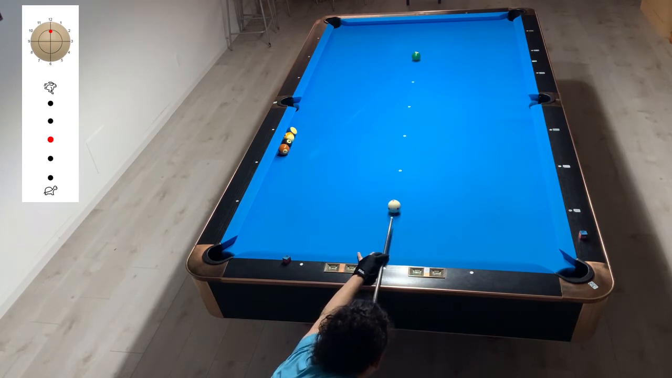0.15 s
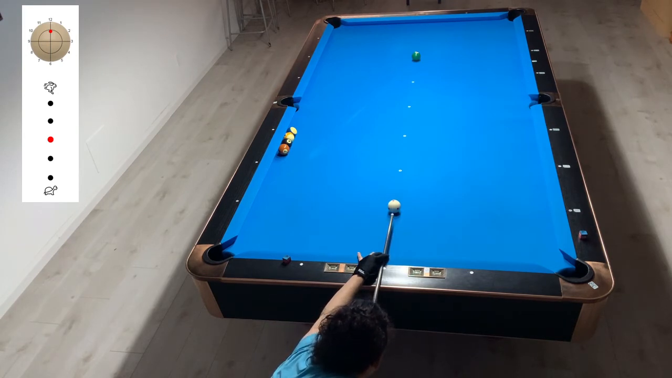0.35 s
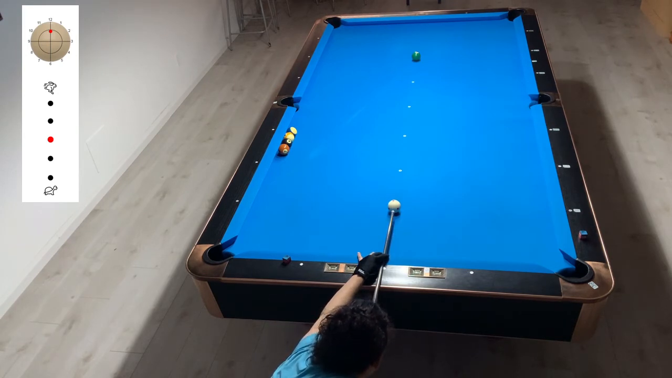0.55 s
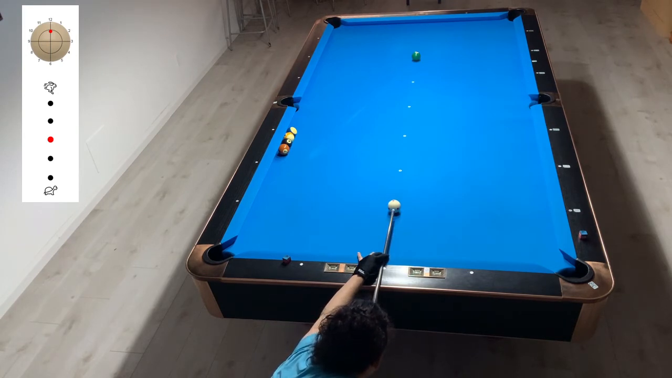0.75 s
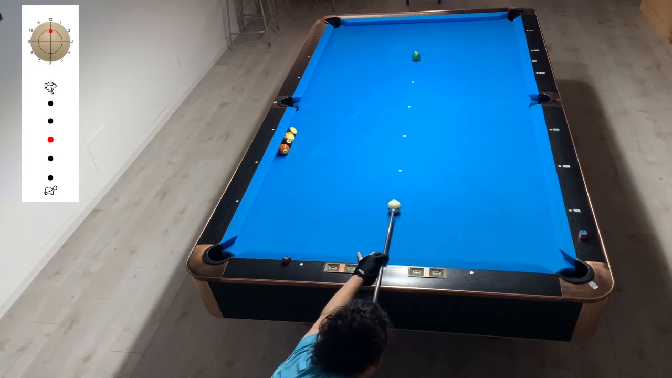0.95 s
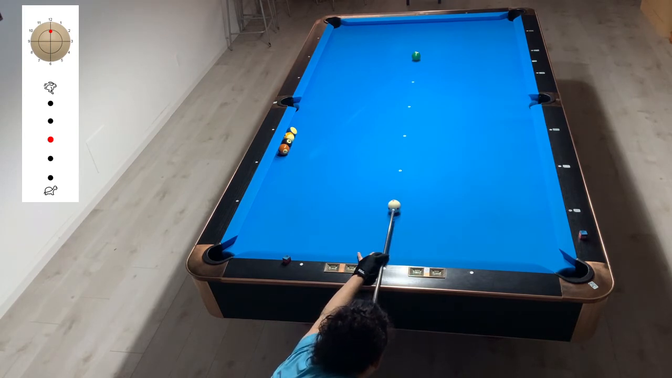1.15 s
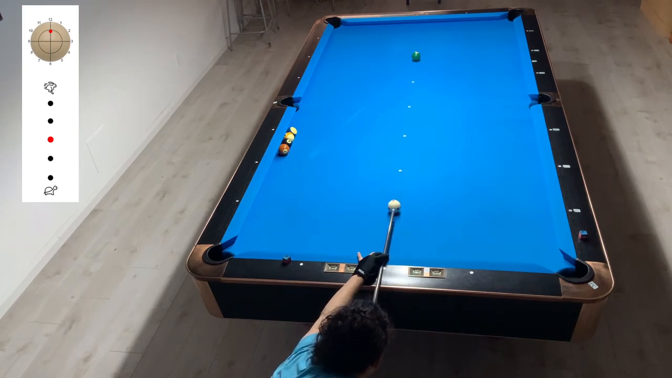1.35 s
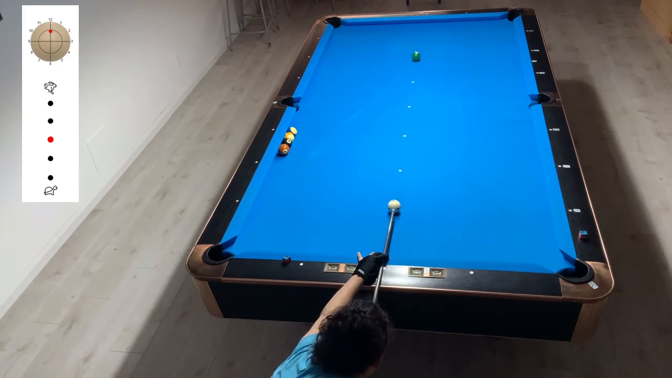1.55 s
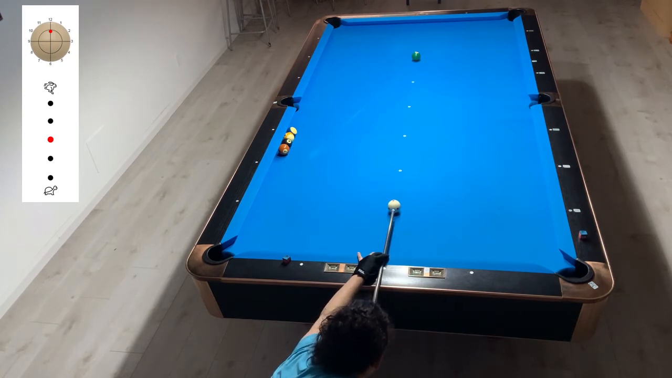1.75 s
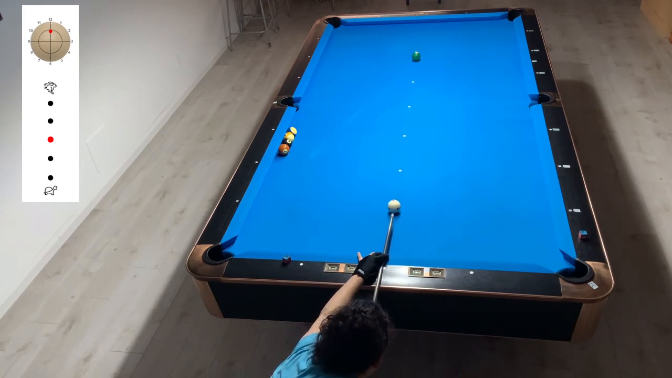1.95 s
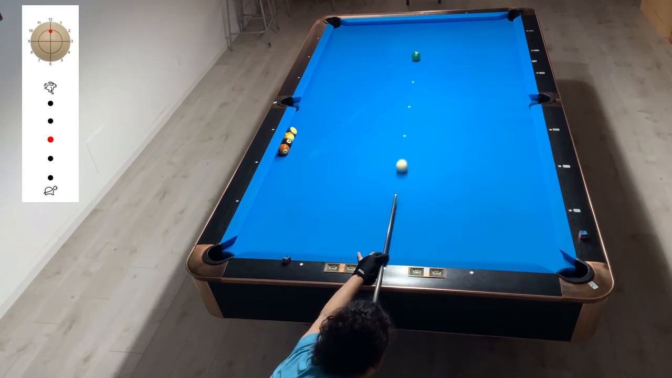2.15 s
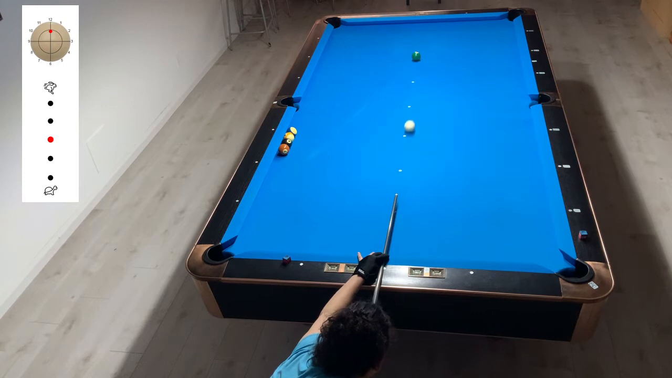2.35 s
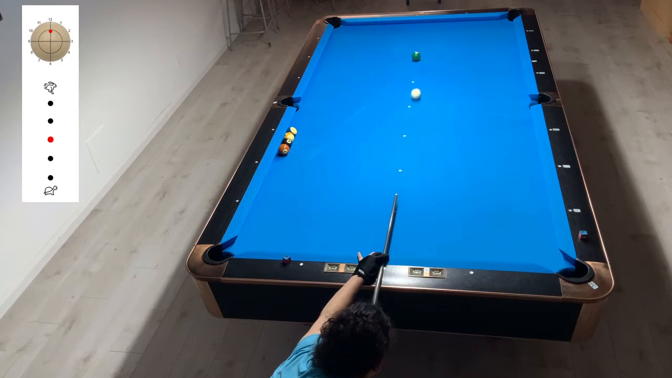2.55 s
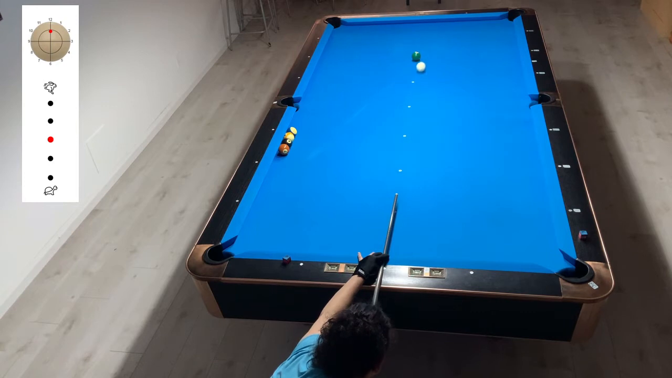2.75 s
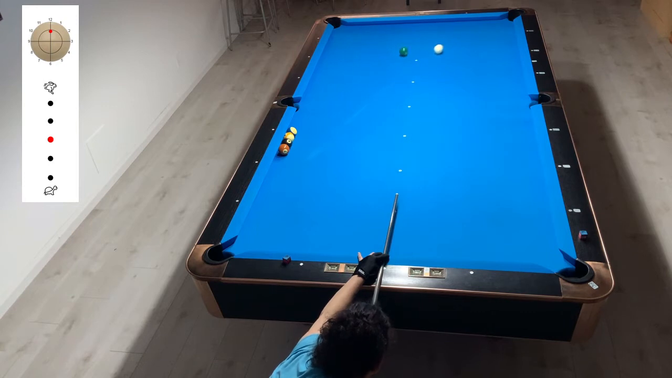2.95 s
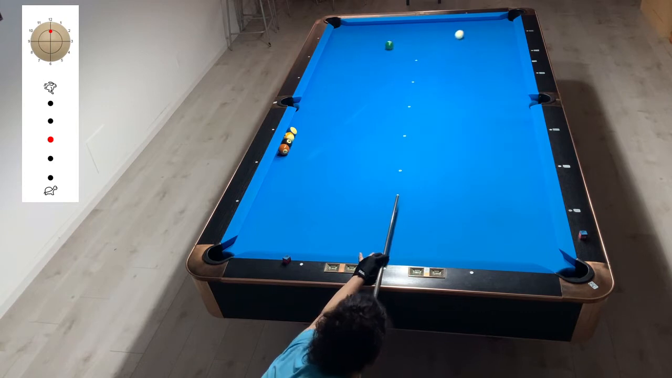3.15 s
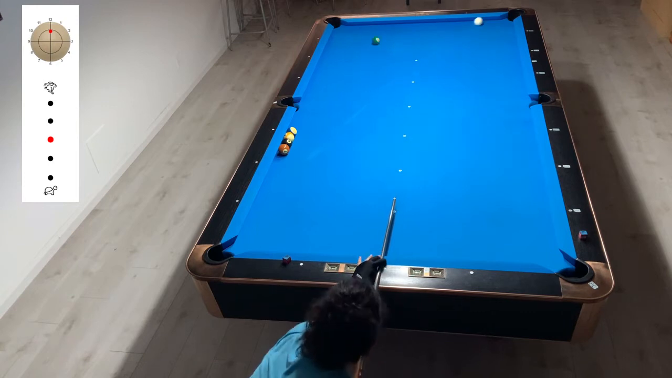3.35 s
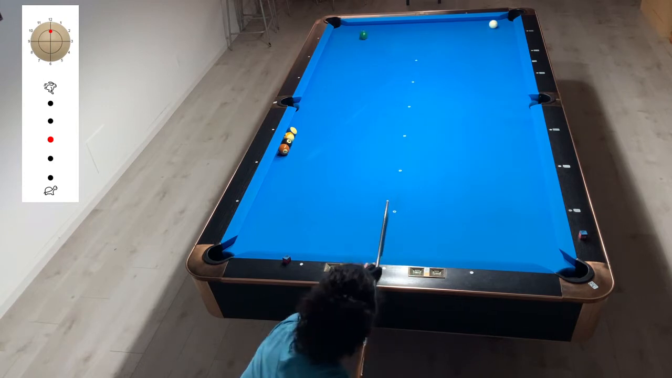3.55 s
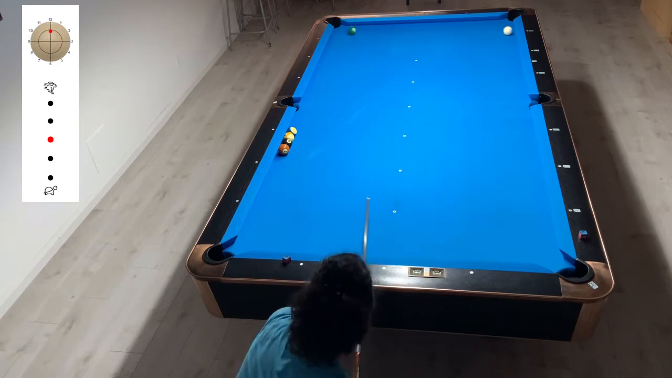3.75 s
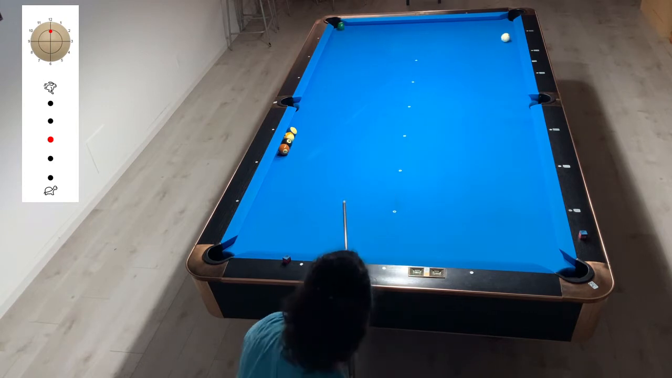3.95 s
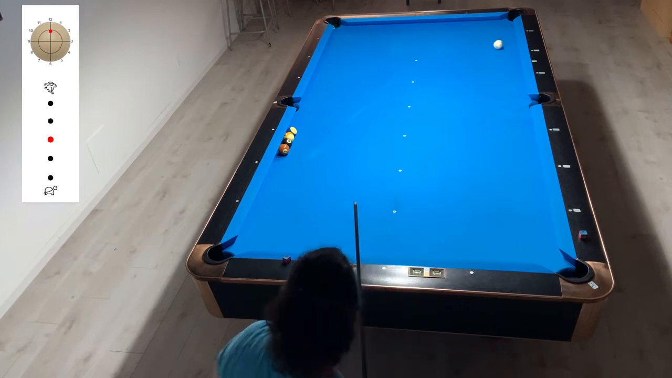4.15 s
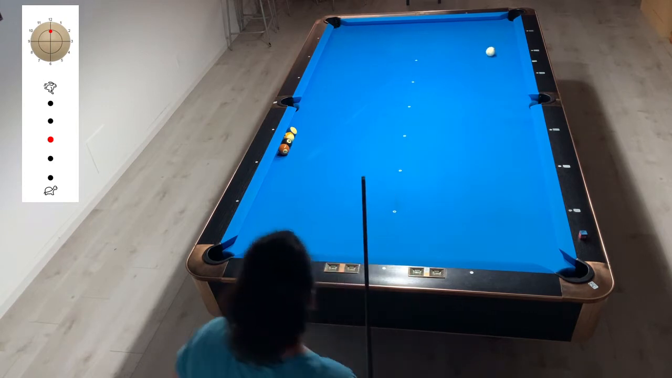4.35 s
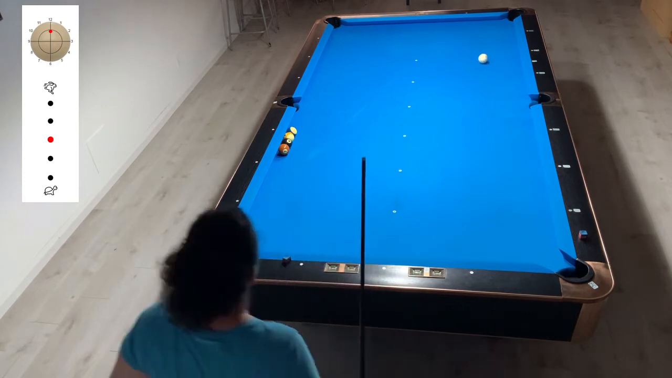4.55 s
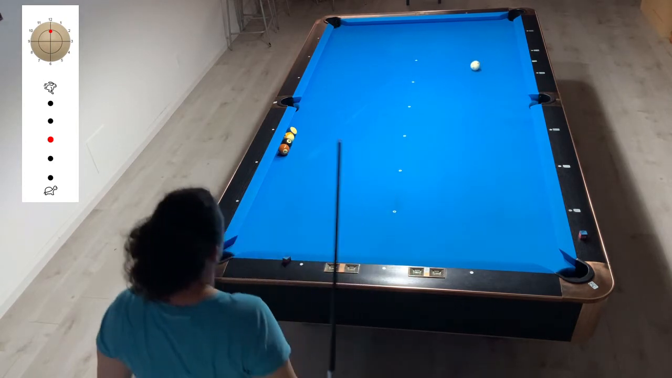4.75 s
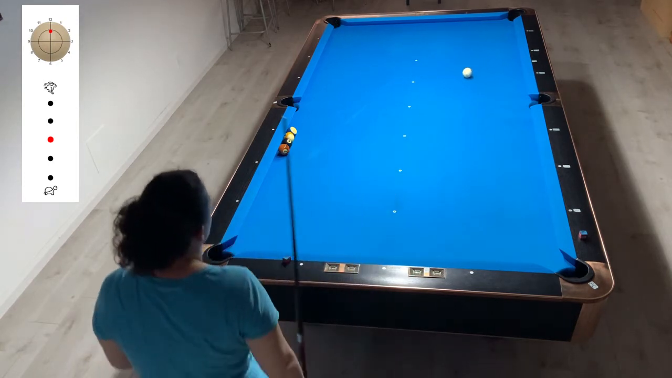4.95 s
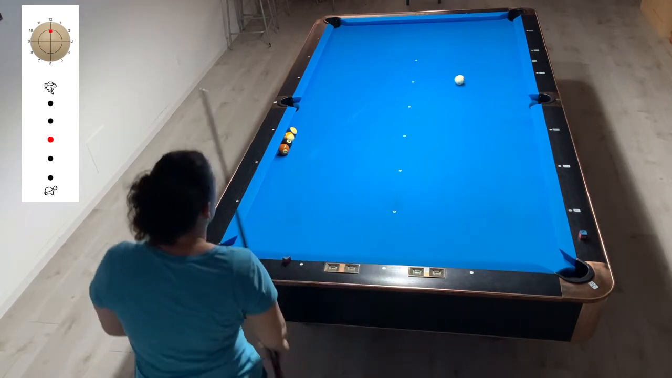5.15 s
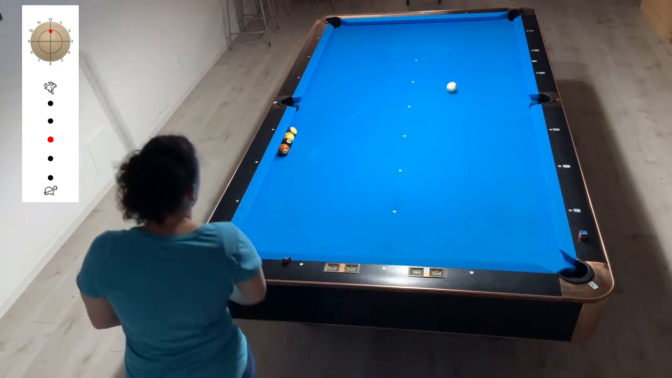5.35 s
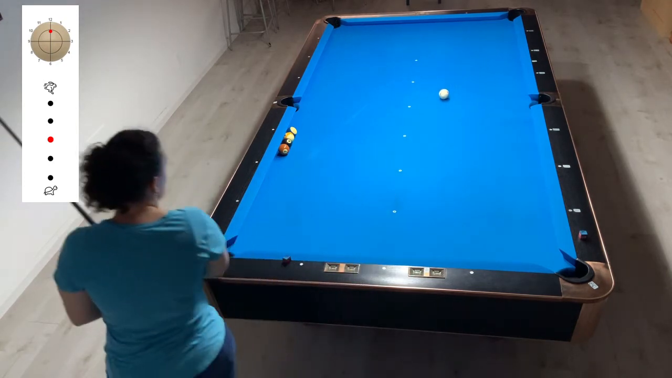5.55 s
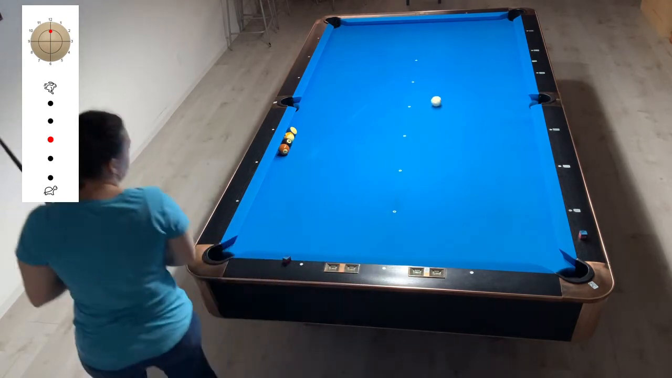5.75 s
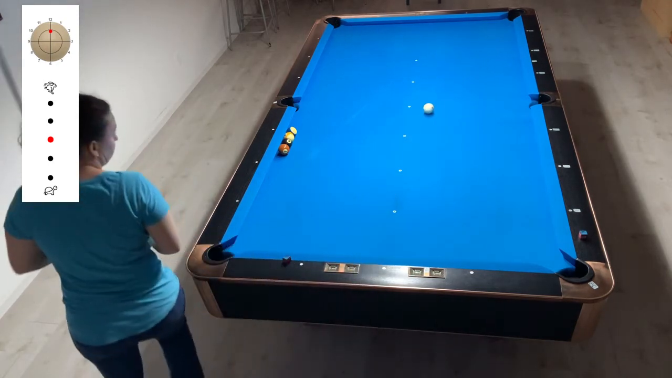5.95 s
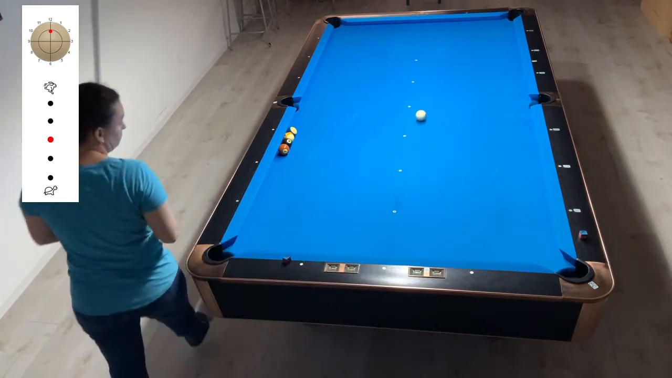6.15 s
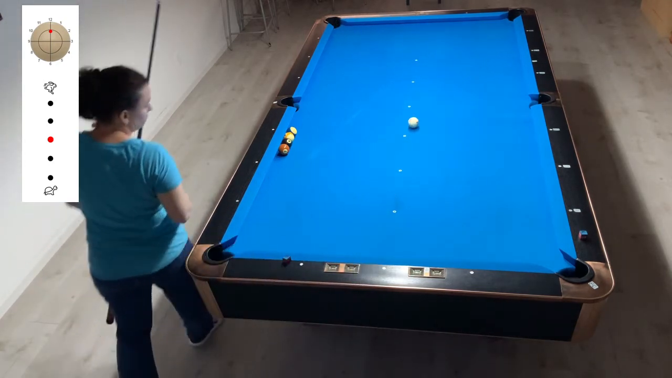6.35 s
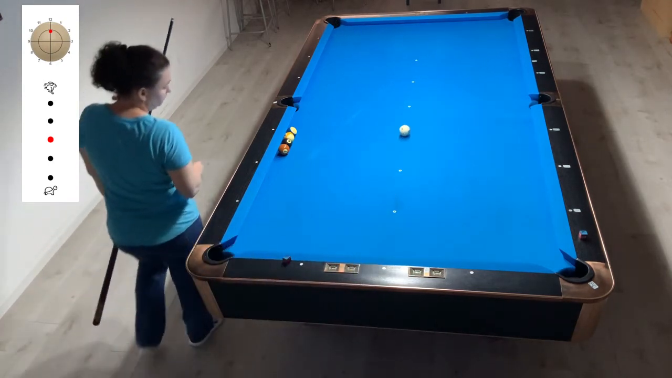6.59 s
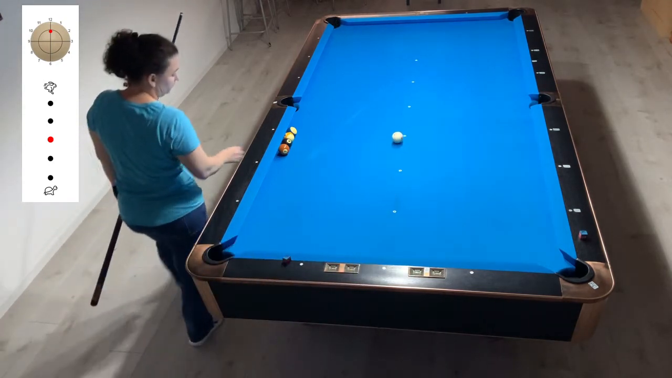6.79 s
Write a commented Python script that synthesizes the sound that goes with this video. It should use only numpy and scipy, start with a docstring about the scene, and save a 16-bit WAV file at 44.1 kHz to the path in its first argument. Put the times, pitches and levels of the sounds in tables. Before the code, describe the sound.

A quiet, hard-walled billiard room has a low, dull background, with faint cloth and hand swishes during the first two seconds. At 2.0 a cue tip cracks sharply against a ball; the wooden shaft rings briefly and a deep, wavering table hum follows. Soft rolling continues until a short, hard ball-to-ball click at 2.87 with a slight slate thud. At 3.45 comes a dull, low cushion thump, then small knocks at 3.87 and 4.09 amid clearer clothing rustle. From 4.26 to 4.64 a ball falls into the pocket in a loud, irregular cluster of hollow wooden clacks and bright ticks, with a strong rumble. It rolls away inside the table, with weaker knocks around 4.8, 5.06, 5.4, 5.6, 5.86, 6.07 and 6.22 and soft pattering bumps. Clothing swishes continue until about 6.8 as rolling and hum fade. Stereo, with close reflections and a short echoing tail.

```python
"""A billiard ball knocks its way over cushion and pocket and down the wooden trough inside the table: each
knock mixes hollow wooden modes, a clack, a bright tick and a frame thump. Before that a cue strikes the white
ball (crack and shaft modes), which clicks on another (a short pulse and high modes). Three deep table modes
hum in beats, shaped noise makes the rolling, the rustling clothes and the room's floor, and a bare hard room
of echoes and dying random taps rings around a small two-port microphone."""
import sys
import numpy as np
from scipy import signal
from scipy.fft import rfft, irfft, next_fast_len
from scipy.io import wavfile
from scipy.ndimage import uniform_filter1d

SR = 44100
rng = np.random.default_rng(int(sys.argv[2]) if len(sys.argv) > 2 else 0)


def wav_record(signal):
    """Record a signal, one row per channel, as 16-bit PCM in the file named by sys.argv[1]."""
    frames = np.transpose(np.atleast_2d(signal))
    bounded = np.clip(frames, -1, 1)
    # unit amplitude maps onto the largest positive 16-bit level
    quanta = np.round(bounded * 32767).astype(np.int16)
    wavfile.write(sys.argv[1], SR, quanta)


N = 300894  # length [samples]

# steady floor of the room, shape only: (frequency [Hz], relative density [dB])
AIR_SHAPE = [(18, -34.5), (30, -1), (64, 0.5), (143, -2), (328, -12), (662, -9), (1240, -22.5), (2310, -30),
             (2560, -35), (7430, -45), (8470, -37.5), (9390, -41.5), (11600, -43.5), (13900, -49.5),
             (15000, -44.5)]
# swishes of cloth and hands, rise and fall spanning 20 dB each:
# (loudest time [s], level before shaping [dB], tilt [dB/octave], rise [s], fall [s])
SWISHES = [(.464, -85.5, -8.5, 0.08, 0.23), (1.124, -90, -5, 0.073, 0.18), (1.462, -87, -10.5, 0.057, 0.27),
           (1.992, -78, -10, 0.07, 0.26), (2.448, -86, -12, 0.051, 0.25), (3.504, -83, -8, 0.88, 0.38),
           (4.0, -67.5, -4, 0.2, 0.11), (4.092, -72.5, -8.5, 0.081, 0.47), (5.042, -75, -10.5, 0.28, 0.71),
           (5.66, -71.5, -8, 0.15, 0.22), (6.11, -74.5, -10.5, 0.39, 0.38), (6.36, -77, -7, .5, 0.34),
           (6.682, -76, -11, 0.23, 0.28)]
# balls rolling on cloth and wood: (time [s], level before shaping [dB])
ROLL_LEVEL = [(2.018, -48), (2.05, -27.5), (2.19, -62.5), (2.32, -67), (2.86, -59.5), (3.22, -68),
              (3.5, -55), (4.12, -87), (4.311, -27), (4.48, -41), (4.79, -50.5), (5.19, -64.5),
              (5.54, -48.5), (5.68, -75), (5.91, -54.5), (6.82, -68)]
# level of the table's hum: (time [s], level [dB])
HUM_LEVEL = [(2.02, -59), (2.1, -33.5), (2.3, -38.5), (2.48, -50), (2.58, -37), (2.8, -46), (3.05, -37.5),
             (3.25, -37), (3.36, -49.5), (3.75, -48), (4.26, -65.5), (4.33, -33), (4.5, -33.5),
             (4.8, -38.5), (4.95, -47.5), (5.15, -49.5), (5.3, -66.5), (5.5, -51.5), (6.1, -54), (6.4, -61),
             (6.62, -48.5), (6.82, -64.5)]
# three close deep modes of the table that beat together: (frequency [Hz], sign at the blow [+1 or -1])
HUM_MODES = [(59.8, 1), (64.6, -1), (69.5, -1)]
# each heavy blow restarts them in its own mix, relative to one another:
# (time [s], low mode [dB], middle mode [dB], high mode [dB])
HUM_STARTS = [(2.0196, -11, -5, -16.5), (2.8648, -14, -6, -9.5), (3.451, -5, 6, -14.5), (4.294, 0, -18, -6),
              (5.373, -11, -18.5, 1.5)]
# modes of the table's frame: (frequency [Hz], relative level [dB], t60 [s])
FRAME_MODES = [(98, 0, .7), (122, -11, .25), (142, -8, .25), (174, -5, .2), (200, -11, .2)]
# the cue stroke: (time [s], level of the shaft's ring [dB])
STROKE = (2.0195, -16)
# modes of the wooden cue shaft: (frequency [Hz], relative level [dB], t60 [s])
SHAFT_MODES = [(305, -1, 0.018), (422, -7.5, 0.022), (560, 2, 0.016), (755, -2.5, 0.022), (995, 0.5, 0.011),
               (1133, -0.5, 0.03), (1328, -8, 0.049), (1590, -9, 0.0081), (1742, -9, .06),
               (2018, -1.5, 0.016), (2430, 5.5, 0.0079), (2780, -5, 0.018), (3305, -4.5, 0.0091),
               (4410, -9.5, .005)]
# ball on ball: (time [s], pulse level before its low-pass [dB])
CLICK = (2.8655, -13)
# bands of the short pulse from the squeezed contact: (frequency [Hz], width [Hz], relative level [dB])
CONTACT_BANDS = [(1352, 1360, 4.5), (2040, 1180, 8), (2714, 830, 0.5), (3460, 710, -10.5)]
# the balls' own high modes: (frequency [Hz], relative level [dB], t60 [s])
BALL_MODES = [(5530, -2.5, 0.0021), (8850, -12.5, 0.0063), (10700, -8, 0.003), (13840, 2, 0.0025),
              (15600, 1.5, 0.0022)]
# knocks on cushion, pocket and trough: (time [s], hollow ring [dB], its centre [Hz],
# clack [dB], its centre [Hz], tick [dB], thump [dB])
KNOCKS = [(3.451, -46, 310, -80, 1500, -88, -42.5), (3.872, -56, 360, -58.5, 2200, -80, -57.5),
          (4.088, -56, 484, -48.5, 1770, -82, -81), (4.259, -27.5, 594, -34.5, 2000, -33, -37.5),
          (4.295, -29, 520, -27.5, 2430, -27, -36), (4.309, -19.5, 540, -34.5, 1300, -45, -29.5),
          (4.327, -30, 450, -50, 2700, -42, -27.5), (4.347, -33, 544, -29, 1190, -28, -49),
          (4.402, -55, 457, -39.5, 1300, -59, -40), (4.511, -28.5, 540, -25, 2640, -33, -57),
          (4.523, -24.5, 542, -42, 2700, -44, -45), (4.585, -44, 536, -45.5, 1290, -63, -47),
          (4.638, -36, 470, -35, 1940, -72, -46), (4.781, -49, 540, -54, 2000, -85, -72),
          (5.055, -49.5, 487, -70, 2000, -78, -68), (5.369, -48, 560, -41.5, 2080, -99, -44),
          (5.394, -46, 443, -51, 2700, -79, -56), (5.551, -41, 440, -78, 1500, -73, -67),
          (5.637, -52, 358, -63, 2000, -55, -56.5), (5.650, -71, 430, -52.5, 4500, -42.5, -71),
          (5.856, -48.5, 507, -70, 2000, -70, -69), (6.065, -46, 494, -61, 1290, -76, -58),
          (6.222, -48.5, 482, -54, 1750, -79, -52.5)]
# slow modes of the hollow wood, before detuning: (frequency [Hz], relative level [dB], t60 [s])
HOLLOW_MODES = [(282, 10, 0.05), (379.5, 8.5, 0.058), (457, -7.5, 0.15), (536.7, 2, 0.069),
                (637, -6.5, 0.042), (678, -1.5, 0.028)]
# short modes of the clack, before detuning: (frequency [Hz], relative level [dB], t60 [s])
CLACK_MODES = [(916, -4, 0.012), (1231, 0.5, 0.014), (1848, 2.5, 0.0088), (2180, -4, 0.012),
               (2576, 3, 0.01), (3540, 0.5, 0.0069), (4410, -7, 0.0076)]
# left-right likeness of the room and the steady noises: (frequency [Hz], likeness [0-1])
LIKENESS = [(60, 0.99), (250, 0.9), (640, 0.24), (1400, 0.11), (6000, 0.019)]
# decay of the room: (frequency [Hz], t60 [s])
ROOM_DECAY = [(100, 1.37), (300, 0.81), (700, 0.5), (1500, 0.67), (3000, 0.51), (5500, 0.52), (8000, 0.36),
              (13000, 0.23)]
# single echoes off table, floor and walls: (delay [s], level [dB])
ECHOES = [(.0044, -1), (.0068, -7), (.0082, -5), (.0097, -6), (.0165, -13), (.026, -9), (.029, -10),
          (.034, -11)]
# left-right likeness and phase of the treble: (frequency [Hz], likeness [0-1], lead [radians])
PORTS = [(4500, 0, 4.5), (7500, .6, 7.9), (8600, .8, 8.9), (9100, .99, 9.42), (10100, .99, 9.43),
         (10500, .75, 10), (11900, .55, 11.4), (12500, .98, 12.56), (14000, .98, 12.57), (14700, .5, 13.8),
         (15500, .6, 15)]
# colour of the microphone: (frequency [Hz], gain [dB])
MICROPHONE = [(22, -16), (45, 0), (14000, 0), (14700, -4), (15500, -5)]

AIR_DB = -61.5
STIR_DB, STIR_TILT_DB = -99, -3.5  # faint stirring under the swishes, before shaping; tilt per octave
LEAD_S = 8 / SR  # the steady noises reach the left port first
PATTER_SPAN_S, PATTER_COUNT = (5.4, 6.0), 7
PATTER_DB, PATTER_HZ = -62, 450  # middle values of the random spread
SLATE_HZ = 151  # blows on the slate favour the frame modes near here
CRACK_S = .0009  # time constant of a crack's fade
CLACK_SPREAD, CLACK_FOCUS_DB = .04, -6  # mode shift as a share of pitch; dB an octave off the centre
RING_PAN_DB, CLACK_PAN_DB = 1, -1  # left minus right
NEARNESS_DB = 7  # how much less room a near sound gets
EDGE_HZ = 15780  # upper band limit


def gain_of(db):
    """Turns decibels into amplitude gain."""
    return 10 ** (np.asarray(db) / 20)


def evened(x):
    """Scales a signal to rms 1."""
    return x / np.sqrt(np.mean(x ** 2) + 1e-20)


def read(points, hz, column=1):
    """Reads a spectrum table on a log-frequency axis."""
    rows = np.transpose(points)
    return np.interp(np.log(hz + 1), np.log(rows[0] + 1), rows[column])


def octaves_off(modes, centre_hz):
    """Distance of each mode from a centre pitch, in octaves."""
    mode_hz = np.transpose(modes)[0][:, None]
    return abs(np.log2(mode_hz / centre_hz))


def add(mix, s, sound, pan_db=0):
    """Places a sound in both channels, panned by left minus right dB."""
    part = mix[:, round(s * SR):][:, :len(sound)]
    part += gain_of([[pan_db / 2], [-pan_db / 2]]) * sound[:part.shape[1]]


def ring(modes, rise_s, detune=1, lift_db=0):
    """Struck body: dying modes of alternate sign that build up over rise_s, scaled to peak 1."""
    hz, db, t60 = np.transpose(modes)[:, :, None]
    t = np.arange(int(t60.max() * SR) + 400) / SR
    sign = (-1) ** np.arange(len(hz))[:, None]
    fade = gain_of(db + lift_db - 60 * t / t60)
    tones = sign * fade * np.sin(2 * np.pi * hz * detune * t)
    out = tones.sum(0) * (1 - np.exp(-t / rise_s)) ** 2
    return out / abs(out).max()


def tick(top_hz):
    """A brief bright crack where hard surfaces meet: fading band-passed noise of energy 3."""
    grit = rng.standard_normal(200)
    crack = grit * np.exp(-np.arange(len(grit)) / SR / CRACK_S)
    crack = signal.lfilter(*signal.butter(1, [4000, top_hz], "band", fs=SR), crack)
    return crack / np.linalg.norm(crack) * np.sqrt(3)


def noise(shape_db, patchy_db, size):
    """Two-channel noise from random short-time spectra; shape_db(hz, t) gives the level field."""
    frames, hz = 4 * N // size + 5, np.fft.rfftfreq(size, 1 / SR)[:, None]
    a, b, c, d, patches = rng.standard_normal((frames, len(hz), 5)).T
    patches = uniform_filter1d(patches, size=12, axis=0)  # blur over frequency, then over time
    patches = evened(uniform_filter1d(patches, size=10, axis=1))
    same = np.clip(read(LIKENESS, hz), 0, 1)
    left = a + 1j * b
    delayed = left * np.exp(-2j * np.pi * hz * LEAD_S)
    right = same * delayed + np.sqrt(1 - same ** 2) * (c + 1j * d)
    t = np.arange(frames) * size / 4 / SR
    spectra = np.array([left, right]) * gain_of(shape_db(hz, t) + patchy_db * patches)
    return signal.istft(spectra, nperseg=size, noverlap=3 * size // 4)[1][:, :N]


def air():
    """The steady floor of the room, as shaped noise at a set rms."""
    steady = noise(lambda hz, t: read(AIR_SHAPE, hz) + 0 * t, patchy_db=.8, size=2048)
    return gain_of(AIR_DB) * evened(steady)


def rustle():
    """Patchy friction noise with two broad scuffing bands, rising and falling with each swish."""
    s, db, tilt_db, rise_s, fall_s = np.transpose(SWISHES)[:, :, None, None]

    def field(hz, t):
        low_cut_db = -18 * np.maximum(np.log2(1100 / (hz + 30)), 0)
        scuff_db = 4 * np.exp(-((hz - 2700) / 450) ** 2) + 3 * np.exp(-((hz - 4900) / 900) ** 2)
        octaves = np.log2((hz + 300) / 4500)
        swell_db = db - 20 * np.maximum((s - t) / rise_s, (t - s) / fall_s)
        # doubled decibels turn gain into power, so the swishes add as powers
        swishes = gain_of(2 * (swell_db + tilt_db * octaves)).sum(0)
        stirring = gain_of(2 * (STIR_DB + STIR_TILT_DB * octaves))
        level_db = 10 * np.log10(swishes + stirring)
        return level_db + low_cut_db + scuff_db - 11.5  # overall level of the rustle
    return noise(field, patchy_db=2.5, size=512)


def rolling():
    """Balls rumble over hollow wood: patchy noise around 480 Hz under the rolling level."""
    s, db = np.transpose(ROLL_LEVEL)

    def field(hz, t):
        body_db = -9 * np.log2((hz + 20) / 480) ** 2
        skirt_db = -25 - 3 * np.log2(hz / 500 + 1)
        level_db = np.interp(t, s, db, left=-99)
        return level_db + np.maximum(body_db, skirt_db) - 16.0  # overall level of the rolling
    return noise(field, patchy_db=4.0, size=1024)


def hum():
    """Three deep table modes beat, mixed anew at each heavy blow, under one level curve."""
    t, starts = np.arange(N) / SR, np.array(HUM_STARTS)
    hz, sign = np.transpose(HUM_MODES)[:, :, None]
    last = np.maximum(np.searchsorted(starts[:, 0], t) - 1, 0)  # the latest blow at each moment
    mix = gain_of(starts[:, 1:])
    share = mix / np.linalg.norm(mix, axis=1, keepdims=True)
    since_blow = t - starts[last, 0]
    tones = (sign * share[last].T * np.sin(2 * np.pi * hz * since_blow)).sum(0)
    smooth = uniform_filter1d(tones, size=90)  # restarts without a click
    level_db = np.interp(t, *np.transpose(HUM_LEVEL), left=-99)
    return np.sqrt(2) * gain_of(level_db) * smooth


def slate_thump():
    """The frame's ring after a blow on top of the table, strongest near the slate's pitch."""
    return ring(FRAME_MODES, 0.011, lift_db=-12 * octaves_off(FRAME_MODES, SLATE_HZ))


def cue(near, far):
    """The leather tip cracks, the wooden shaft rings, the table takes the push."""
    s, db = STROKE
    add(near, s, gain_of(db) * ring(SHAFT_MODES, 0.0012), -1)
    add(far, s, gain_of(-27.0) * tick(top_hz=16000))
    add(near, s, gain_of(-36.5) * slate_thump())


def balls(far):
    """Two hard balls squeeze and spring apart in one short pulse; the slate under them thuds."""
    s, db = CLICK
    contact_modes = [(hz, level, 2.1 / width) for hz, width, level in CONTACT_BANDS]  # wide bands die fast
    pulse = ring(contact_modes, 0.00028)
    soft = signal.sosfilt(signal.butter(6, 4300, fs=SR, output="sos"), pulse)
    thud = ring([(420, -2.0, 0.03), (230, -6, 0.011)], 0.0038)
    add(far, s, gain_of(db) * soft, -1.5)
    add(far, s, gain_of(-36.0) * ring(BALL_MODES, .00005))
    add(far, s, gain_of(-47.0) * thud)
    add(far, s, gain_of(-47.0) * slate_thump())


def patter():
    """Knock rows for faint bumps as the ball runs down the trough: soft rings with hardly any clack."""
    chance = rng.uniform(-1.3, 1, (PATTER_COUNT, 3))
    s = np.linspace(*PATTER_SPAN_S, PATTER_COUNT) + .03 * chance[:, 0]
    db = PATTER_DB + 4 * chance[:, 1]
    hz = PATTER_HZ * 2 ** (.3 * chance[:, 2])
    return list(zip(s, db, hz, db - 20, np.full_like(s, 2000), db - 26, db - 8))


def knocks(near, far):
    """Each blow clacks at once, then the hollow wood swells near its spot's pitch and the frame thumps."""
    thump = ring(FRAME_MODES, 0.0027)
    for s, db, hz, clack_db, clack_hz, tick_db, thump_db in KNOCKS + patter():
        # each blow lands on other wood, which shifts the modes
        detune = 1 + .006 * rng.uniform(-1, 1)
        shift = 1 + CLACK_SPREAD * rng.uniform(-1.18, 1, (len(CLACK_MODES), 1))
        spot_db = -40 * octaves_off(HOLLOW_MODES, hz)  # modes near the spot's pitch ring most
        focus_db = CLACK_FOCUS_DB * octaves_off(CLACK_MODES, clack_hz)
        hollow = ring(HOLLOW_MODES, 0.0024, detune, spot_db)
        clack = ring(CLACK_MODES, .0004, shift, focus_db)
        add(near, s, gain_of(db) * hollow, RING_PAN_DB)
        add(far, s, gain_of(clack_db) * clack, CLACK_PAN_DB)
        add(near, s, gain_of(tick_db) * tick(top_hz=9400), CLACK_PAN_DB)
        add(near, s, gain_of(thump_db) * thump)


def room(near, far, tail_db):
    """A few single echoes from table, floor and walls, then sparse random taps dying band by band."""
    size = 3 * SR // 2
    taps = np.zeros((2, size))
    at = np.arange(80, size - 20, 20) + rng.integers(0, 20, (2, (size - 81) // 20))
    np.put_along_axis(taps, at, rng.choice([-1., 1.], at.shape), 1)
    hz, t, spectra = signal.stft(taps, SR, nperseg=512)
    same = np.clip(read(LIKENESS, hz), 0, 1)[:, None]
    # long waves reach both ports alike
    spectra[1] = same * spectra[0] + np.sqrt(1 - same ** 2) * spectra[1]
    fade = gain_of(-60 * t / read(ROOM_DECAY, hz)[:, None])
    tail = signal.istft(spectra * fade, SR, nperseg=512)[1][:, :size]
    tail *= 1 - np.exp(-np.arange(size) / SR / 0.012)  # the diffuse field builds up
    tail *= gain_of(tail_db) / np.linalg.norm(tail[0])
    early = np.zeros((2, SR // 20))
    for (s, db), skew in zip(ECHOES, rng.integers(-4, 5, len(ECHOES))):
        delay = round(s * SR)
        early[[0, 1], [delay, delay + skew]] = gain_of(db)
    tail[:, :SR // 20] += early
    send = far + gain_of(-NEARNESS_DB) * near
    return near + far + signal.fftconvolve(send, tail, axes=1)[:, :N]


def scene():
    """Sends the blows through the room and lays them over the steady layers."""
    near, far = np.zeros((2, 2, N))
    background = air() + rustle() + rolling() + hum()
    cue(near, far)
    balls(far)
    knocks(near, far)
    return background + room(near, far, tail_db=5)


def record(dry):
    """A likeness table shares the treble between the channels; the microphone colours it; a band limit ends it."""
    size = next_fast_len(N)
    left, right = rfft(dry, size, axis=1)
    hz = np.fft.rfftfreq(size, 1 / SR)
    like = read(PORTS, hz)
    turned = left * np.exp(-1j * read(PORTS, hz, column=2))
    right = like * turned + np.sqrt(1 - like ** 2) * right
    coloured = np.array([left, right]) * gain_of(read(MICROPHONE, hz))
    ports = irfft(coloured, size, axis=1)[:, :N]
    band_limit = signal.firwin(511, EDGE_HZ, window=("kaiser", 9), fs=SR)
    return signal.oaconvolve(ports, band_limit[None], "same")


dry = scene()
out = record(dry)
wav_record(out)
```